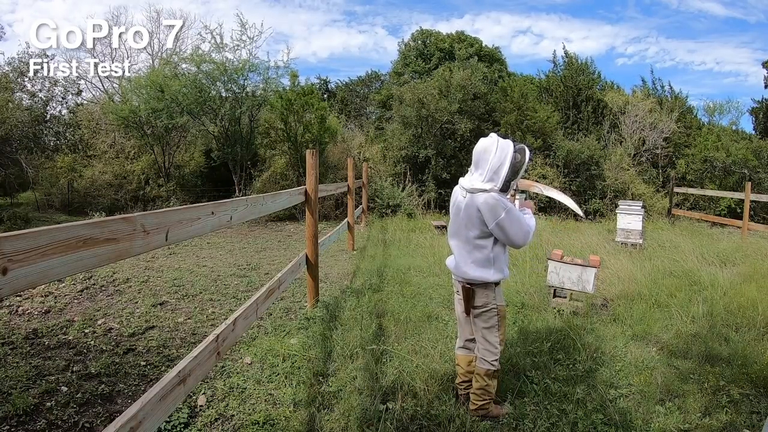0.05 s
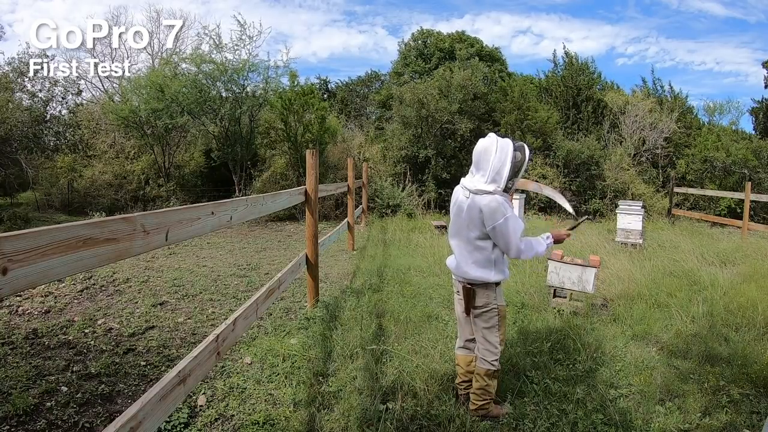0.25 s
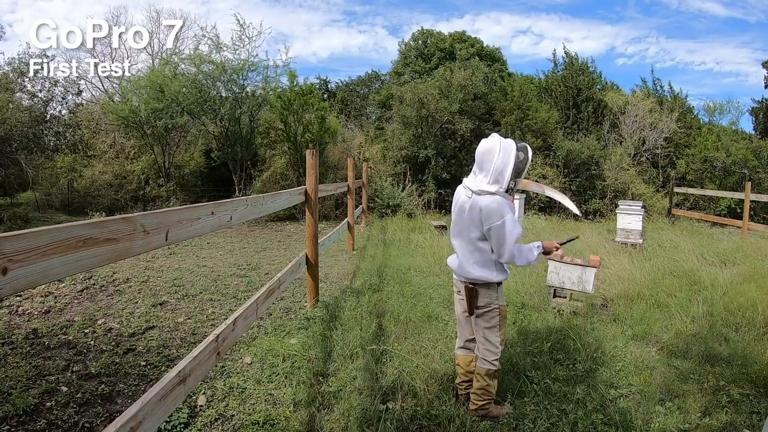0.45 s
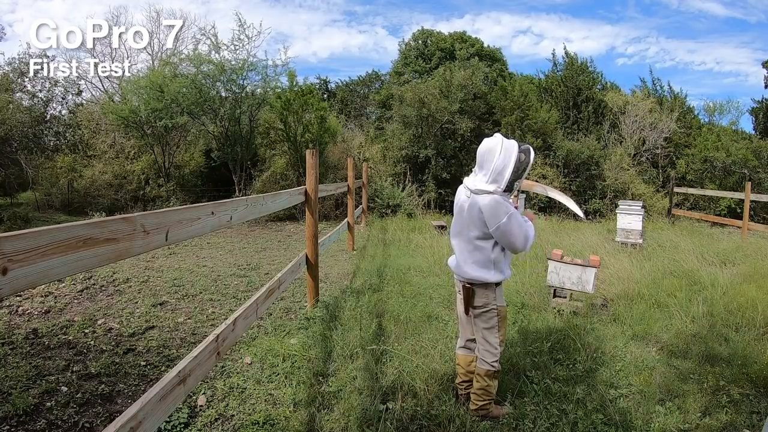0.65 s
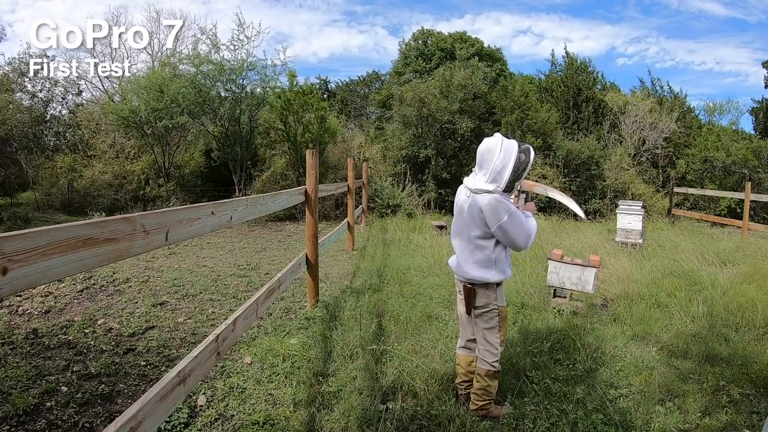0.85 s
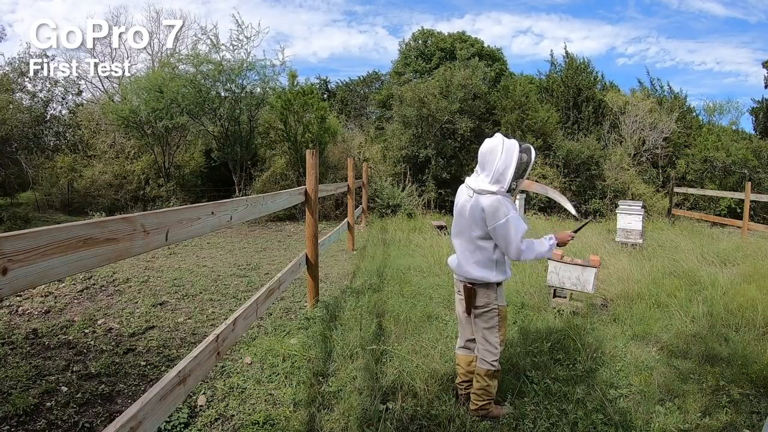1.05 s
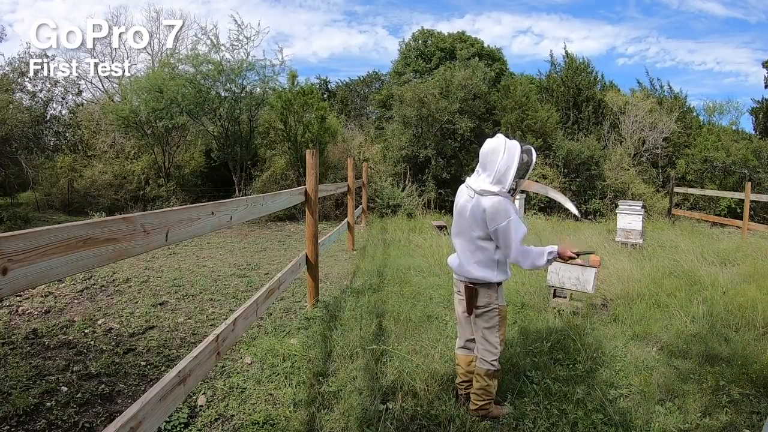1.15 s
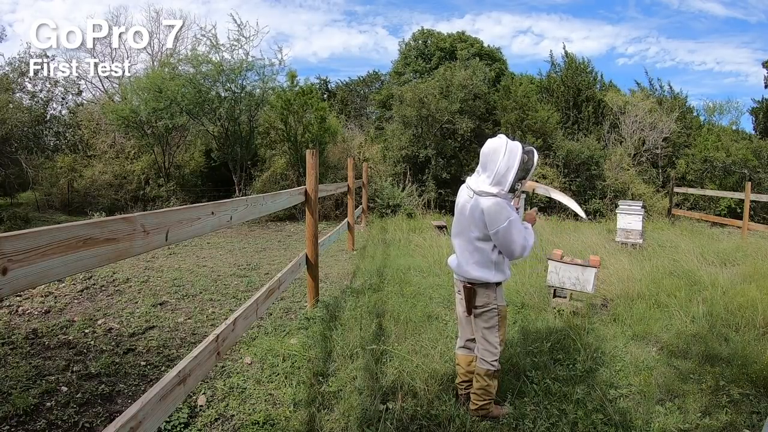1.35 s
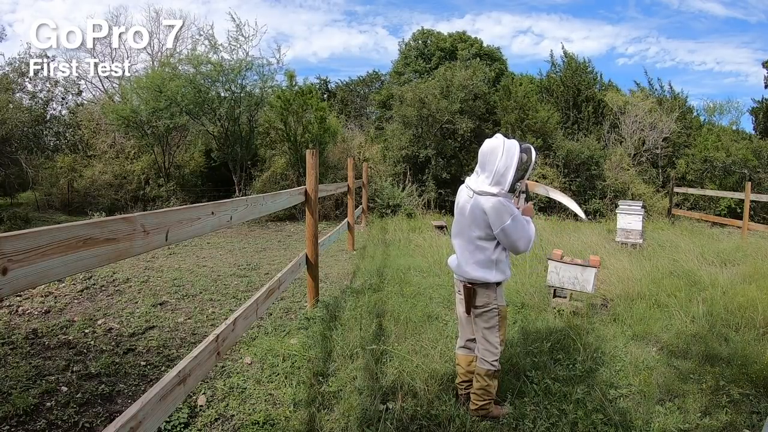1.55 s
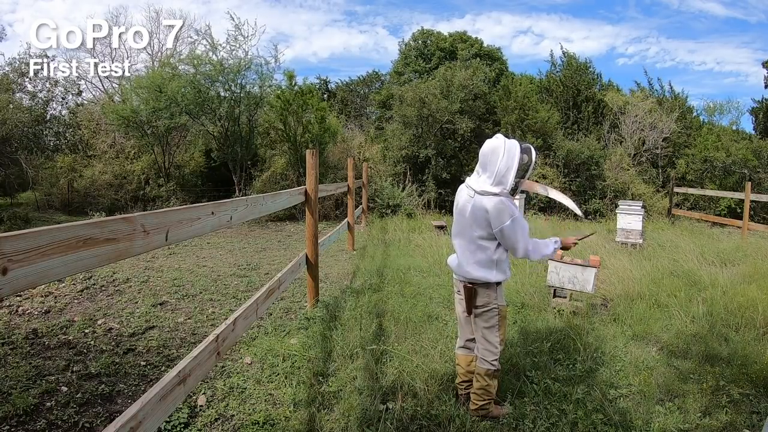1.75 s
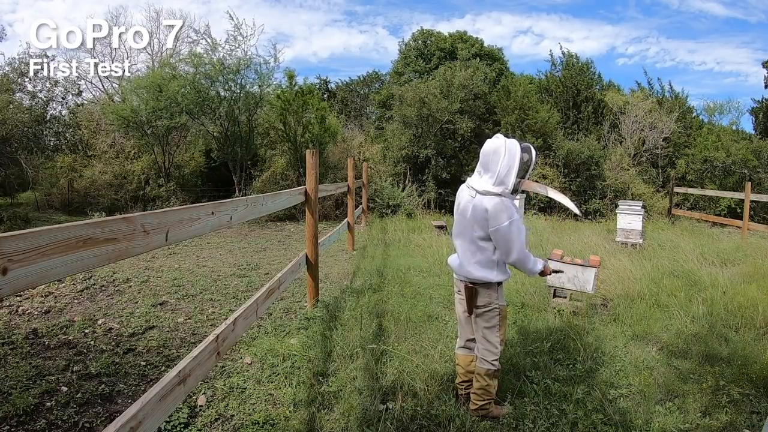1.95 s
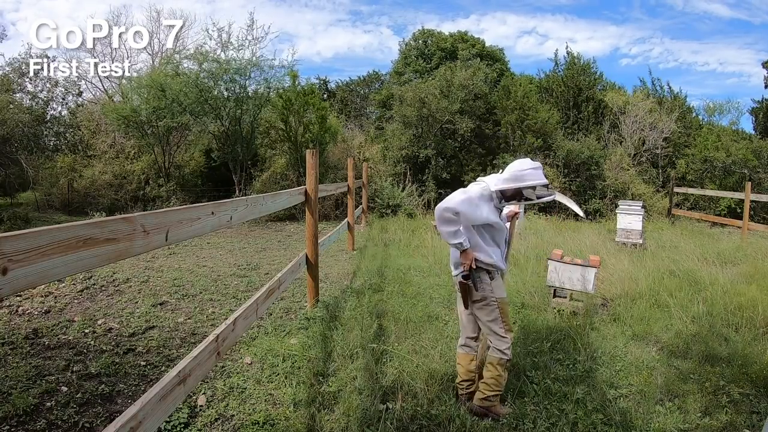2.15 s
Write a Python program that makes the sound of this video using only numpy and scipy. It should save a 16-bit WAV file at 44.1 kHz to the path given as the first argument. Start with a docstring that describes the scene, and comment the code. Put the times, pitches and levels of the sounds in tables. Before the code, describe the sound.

A whetstone scrapes a long steel blade in three quick strokes, each ending in a bright ring

```python
"""Sharpening a long blade outdoors

A whetstone is drawn three times along a long steel blade in an open field, over light wind and faint air noise.
Rough clicks through the damped blade make the scrapes; noise bursts make knocks, and sparser clicks the bites.
When the stone lets go, fading tones make the blade ring; there are also brief squeals and one faint chirp. Near
the end everything cuts off at once, and a gustier moment of shaped noise takes over."""
import sys
import numpy as np
from scipy import signal
from scipy.fft import rfft, irfft
from scipy.io import wavfile
from scipy.ndimage import uniform_filter1d

SR = 44100
rng = np.random.default_rng(int(sys.argv[2]) if len(sys.argv) > 2 else 0)


def materialize(psi):
    """Save the field psi as 16-bit PCM at rate SR to the path in sys.argv[1].

    A 1-D psi becomes a single channel; in a 2-D psi each row is a channel.
    """
    bounded = np.clip(np.atleast_2d(psi).T, -1, 1)
    quanta = np.round(bounded * 32767).astype(np.int16)
    wavfile.write(sys.argv[1], SR, quanta)


N = 97020  # length in samples: 2.2 s
TIME = np.arange(N) / SR


def amp(db):
    """Turns decibels into a plain multiplier."""
    return 10 ** (np.asarray(db) / 20)


def unit(x):
    """Scales a sound to an average (RMS) level of one."""
    return x / np.sqrt(np.mean(x ** 2) + 1e-20)


def read(points, hz):
    """Reads a curve between its points, along a logarithmic frequency scale."""
    point_hz, value = np.transpose(points)
    return np.interp(np.log(hz + 1), np.log(point_hz + 1), value)


def add(mix, s, sound):
    """Adds a sound into the mix from time s, cutting it off at the end."""
    start = max(round(s * SR), 0)
    part = mix[:, start:][:, :sound.shape[1]]
    part += sound[:, :part.shape[1]]


def colour(x, spectrum, tilt_db=0):
    """Reshapes the strength of each frequency, tilted in dB per octave above 500 Hz, at unit level."""
    hz = np.fft.rfftfreq(x.shape[-1], 1 / SR)
    octaves = np.log2(np.maximum(hz, 500))
    gain = amp(read(spectrum, hz) + tilt_db * octaves)
    return unit(irfft(rfft(x) * gain, x.shape[-1]))


# How much louder the left microphone is: (frequency [Hz], left minus right [dB])
BALANCE = [(170, -1.5), (450, 3), (740, -6), (1200, -10), (2000, -1.5), (3300, -5), (5500, 0.5),
           (9000, 1.5), (15000, -2)]
# How far the left microphone is ahead in phase: (frequency [Hz], lead [radians])
LEAD = [(200, -0.72), (2800, 0.3), (6200, -1.1), (8100, -1.87), (12000, -1.8)]


def ports(hz):
    """Loudness and phase (as complex numbers) of the blade at the left and right microphone."""
    half = amp(read(BALANCE, hz) / 2) * np.exp(.5j * read(LEAD, hz))
    power = (abs(half) ** 2 + abs(half) ** -2) / 2
    return np.array([half, 1 / half]) / np.sqrt(power)


# How alike the two microphones sound: (frequency [Hz], likeness [0 to 1])
LIKENESS = [(200, 0.65), (700, .6), (1300, 0.79), (2400, 0.81), (4400, 0.95), (8000, 0.46), (15000, 0.36)]


def placed(pair):
    """Mixes two unrelated signals into the partly alike pair that the two microphones hear."""
    hz = np.fft.rfftfreq(pair.shape[1], 1 / SR)
    a, b = rfft(pair)
    same = read(LIKENESS, hz)
    left = same * a + np.sqrt(1 - same ** 2) * b
    return irfft(np.array([left, a]) * ports(hz), pair.shape[1])


def outdoor_noise(spectrum, shared):
    """Noise partly shared by both microphones, because each adds its own to a common part."""
    a, b, both = rng.standard_normal((3, N))
    return colour(np.array([a, b]) + shared * both, spectrum)


def buffeting(spectrum, lumpy_db, shared):
    """Wind on the microphones swells in quick random lumps, made by smoothing noise twice."""
    lumps = rng.standard_normal(N)
    for _ in range(2):
        lumps = uniform_filter1d(lumps, size=800)
    return unit(outdoor_noise(spectrum, shared) * amp(lumpy_db * unit(lumps)))


# Strength of the wind: (time [s], level [dB])
WIND = [(0, -65), (.22, -60), (.4, -64), (.7, -64.5), (.9, -80), (1.15, -67), (1.22, -52.5), (1.33, -57),
        (1.52, -52.5), (1.72, -52.5), (1.92, -67.5), (2.06, -53)]
# Colour of the wind rumble: (frequency [Hz], level [dB])
RUMBLE = [(20, -6), (45, 1), (90, -2.5), (150, -6.5), (250, -25), (500, -42.5), (2000, -65)]


def wind():
    """Wind pushing on the microphones makes a lumpy low rumble that rises and falls."""
    level = amp(np.interp(TIME, *np.transpose(WIND)))
    return level * buffeting(RUMBLE, lumpy_db=3.5, shared=1.0)


AIR_DB = -63.5
# Colour of the steady outdoor noise: (frequency [Hz], level [dB])
AIR = [(60, -17.5), (130, 0), (250, 0.5), (500, -6.5), (800, -5.5), (1400, -11.5), (2800, -12), (5000, -19),
       (8000, -24), (10500, -35.5), (15000, -65)]


def air():
    """Faint steady noise of the open air, partly the same at both microphones."""
    return amp(AIR_DB) * outdoor_noise(AIR, shared=1.0)


def grit(per_s, spread_db=4.5):
    """Clicks of uneven size at random moments as grains catch the steel."""
    size = amp(spread_db * np.minimum(rng.exponential(1, N), 3))
    caught = rng.random(N) < per_s / SR
    return unit(size * rng.choice([-1, 1], N) * caught)


HELD_SHARE = 0.94  # share of each click's energy that passes through the blade's resonances


def held_blade(clicks, t60, size=8192):
    """The blade's crowded, damped resonances, as two fading noises; the first also passes the direct click."""
    fade = amp(-60 * np.arange(size) / SR / t60)
    body = rng.standard_normal((2, size)) * fade
    body *= np.sqrt(HELD_SHARE) / np.linalg.norm(body, axis=1, keepdims=True)
    body[0, 0] += np.sqrt(1 - HELD_SHARE)
    return signal.fftconvolve(clicks[None], body, axes=1)[:, :N]


GRIT_PER_S = 7000  # average clicks per second
HELD_T60 = 0.095  # seconds to fade by 60 dB while the stone damps the blade
BRIGHTEN_DB_PER_OCT = 3  # change of tilt from the start to the end of a stroke
# Force of the stone on the edge, one list per stroke: (time [s], level [dB])
STROKES = [
    [(.034, -41), (.06, -48.5), (.09, -51), (.125, -39), (.15, -38), (.205, -35.5), (.26, -36.5),
     (.335, -30.5), (.36, -44.5)],
    [(.922, -38.5), (.95, -38.5), (1.0, -38.5), (1.06, -34.5), (1.125, -32), (1.175, -32)],
    [(1.655, -48), (1.675, -39.5), (1.70, -38.5), (1.735, -33.5), (1.76, -31.5), (1.82, -30.5), (1.85, -31),
     (1.88, -26.5)],
]
# Colour of the scraping, before the tilt: (frequency [Hz], level [dB])
SCRAPE = [(120, -19.5), (250, -15), (450, -20), (650, -16.5), (900, -9), (1100, -5.5), (1300, -8.5),
          (1650, -6), (2400, -2.5), (3500, -1.5), (5500, -5.5), (7600, -4.5), (9800, -13.5), (11200, -23),
          (13500, -27), (15400, -36.5)]


def scrape(force, count=5):
    """The stone travels along the edge: resonances change with its place and the hiss brightens."""
    s, db = np.transpose(force)
    level = amp(np.interp(TIME, s, db)) * (TIME >= s[0]) * (TIME < s[-1])
    place = np.clip((TIME - s[0]) / (s[-1] - s[0]), 0, 1)
    clicks = grit(GRIT_PER_S) * level
    out = 0
    # Crossfade between spots along the blade, each with its own resonances
    for spot in np.linspace(0, 1, count):
        near = np.sqrt(np.maximum(1 - abs(place - spot) * (count - 1), 0))
        tilt_db = BRIGHTEN_DB_PER_OCT * (spot - .55)
        part = colour(held_blade(clicks * near, HELD_T60), SCRAPE, tilt_db)
        out = out + part * np.sqrt(np.mean((level * near) ** 2))
    return out


KNOCK_T60 = 0.11  # seconds to fade by 60 dB
# Knocks of the stone on the edge: (time [s], level [dB])
KNOCKS = [(.034, -41.5), (.158, -34), (0.9216, -35), (1.655, -46)]
# Colour of a knock: (frequency [Hz], level [dB])
CLANK = [(150, -26.5), (400, -15.5), (700, 2), (1500, -3), (2500, 2.5), (4300, 4), (6000, -9.5),
         (8000, -7.5), (10000, -32), (12000, -37), (15000, -48.5)]


def knock(s, db):
    """The stone knocks on the edge: a burst of noise is the short clank of the damped blade."""
    t = TIME - s
    fade = (t >= 0) * amp(db - 60 * np.maximum(t, 0) / KNOCK_T60)
    return fade * colour(rng.standard_normal((2, N)), CLANK)


def field(x, level_db=-30, t60=.9):
    """Faint scattered echoes from grass, fence and trees, as a fading tail of noise."""
    t = np.arange(SR) / SR
    echo_colour = [(200, 15.5), (3000, -1.5), (6000, -2), (12000, -15)]  # (frequency [Hz], level [dB])
    tail = colour(rng.standard_normal((2, SR)), echo_colour)
    tail *= np.minimum(t / .03, 1) * amp(-60 * t / t60)
    tail /= np.linalg.norm(tail[0])
    return amp(level_db) * signal.fftconvolve(x, tail, axes=1)[:, :N]


def whistle(s, length, start_hz, end_hz, db, width_hz):
    """A short fuzzy tone that swells and fades: slow noise carried up to the wanted pitch."""
    t = np.arange(0, length, 1 / SR)
    real, imaginary = rng.standard_normal((2, SR // 4))
    lowpass = signal.butter(2, width_hz / 2, fs=SR, output="sos")
    fuzz = signal.sosfilt(lowpass, real + 1j * imaginary)[-len(t):]
    hz = start_hz + (end_hz - start_hz) * t / length
    turn = np.exp(2j * np.pi * np.cumsum(hz) / SR)
    tone = fuzz * turn * np.sin(np.pi * t / length)
    return s, amp(db) * unit((ports(start_hz)[:, None] * tone).real)


# Brief squeals: (time [s], length [s], pitch [Hz], level [dB])
SQUEALS = [(0.099, 0.051, 3296, -50), (0.18, 0.078, 2434, -40), (0.199, .05, 896, -47),
           (1.684, 0.0407, 4670, -41), (1.772, 0.0516, 3407, -42), (1.81, 0.024, 6150, -38.5)]


def squeal(s, length, hz, db):
    """The stone sticks and slips in a brief rough squeal, a fuzzy tone at one pitch."""
    return whistle(s, length, hz, hz, db, width_hz=110)


CHATTER_PER_S = 4500  # average clicks per second
BITE_T60 = 0.11  # seconds to fade by 60 dB
# Hard bites near the tip: (time [s], level [dB], rise [s], hold [s], tilt [dB per octave])
BITES = [(0.341, -26.5, 0.0024, .012, 7.5), (0.348, -19, .009, 0.018, -1.5),
         (1.133, -25, 0.012, 0.027, 1.0), (1.161, -19, 0.0079, 0.0061, -0.5),
         (1.864, -31, 0.0036, 0.0163, -5)]
# Colour of a bite, before its tilt: (frequency [Hz], level [dB])
BITE = [(90, -44.5), (150, -26), (300, -20.5), (480, -30), (620, -16), (850, -7.5), (1100, -6),
        (1500, -20.5), (2050, -3.5), (3000, 0.5), (3900, 1.5), (5200, -0.5), (7500, -6.5), (9800, -20.5),
        (11300, -33.5), (14000, -37), (15400, -52)]


def bite(s, db, rise, hold, tilt_db):
    """The stone chatters hard over the tip as clicks in the damped blade; the clash dies quickly."""
    t = TIME - s
    fade = amp(db - 60 * np.maximum(t - rise - hold, 0) / BITE_T60)
    level = np.clip(t / rise, 0, 1) * fade
    return level * colour(held_blade(grit(CHATTER_PER_S), BITE_T60), BITE, tilt_db)


# The stone leaves the blade: (time the ringing peaks [s], build-up [s], level of the weak modes [dB])
RELEASES = [(.385, 0.031, -27), (1.182, .016, -24), (1.884, .016, -31.5)]
# Pitches at which the free blade rings, its modes: (frequency [Hz])
MODE_HZ = [175, 279, 540, 842, 1077, 1339, 1388, 1505, 1696, 1790, 1862, 2082, 2466, 2687, 2807, 3008, 3246,
           3290, 3425, 3808, 3972, 4306, 4651, 4855, 5178, 5868, 6019, 6190, 6454, 6896, 7000, 7385, 7795,
           8270, 9570]
# The modes in the same order: (60 dB fade time before the limit below [s],
# level after stroke 1 [dB], after stroke 2 [dB], after stroke 3 [dB])
MODES = [(1.07, -43.5, -41.5, -87), (1.3, -54, -61.5, -73), (0.28, -54, -45, -60), (.22, -41.5, -51.5, -38),
         (0.2, -36, -33.5, -28.5), (0.38, -42, -68.5, -60), (0.45, -40, -47, -49.5),
         (.32, -51.5, -49.5, -39), (0.42, -42, -40.5, -41.5), (0.33, -37, -39, -35.5),
         (0.84, -36, -32, -44), (0.24, -32.5, -31.5, -27), (.34, -36.5, -37.5, -33.5),
         (0.99, -37.5, -45, -45), (0.2, -50, -46, -30), (0.4, -18.5, -28.5, -39),
         (0.51, -58.5, -47.5, -33.5), (.3, -37.5, -42, -61), (0.16, -41, -47, -33), (0.27, -37, -27.5, -54),
         (.33, -50.5, -43, -43), (.28, -47.5, -27.5, -57), (.28, -33, -37, -63), (0.19, -26.5, -27, -52),
         (.32, -43.5, -32, -62), (0.32, -38, -32.5, -33), (0.67, -38, -56.5, -52), (.31, -39, -32, -54),
         (0.21, -43.5, -46.5, -57), (0.23, -41.5, -48, -58), (0.7, -50, -32, -44),
         (0.46, -33, -39.5, -33.5), (0.58, -35, -32, -55), (0.18, -46.5, -34, -58), (0.31, -49, -41.5, -44)]
# Losses in the steel limit the ringing: (frequency [Hz], longest 60 dB fade time [s])
LONGEST_T60 = [(1900, 1.4), (2500, .4), (3000, .33), (7000, .33), (8000, .25), (10000, .24)]
# The mode between these limits is a close pair that beats: (low [Hz], high [Hz])
TWIN_BAND = (2900, 3100)
TWIN_SPLIT_HZ = 1.98
# Colour of the crowd of weak modes: (frequency [Hz], level [dB])
SHIMMER = [(300, -26.5), (650, -13), (900, -14), (1500, -11.5), (2500, -1.5), (5000, -4.5), (8000, -3.5),
           (10000, -12), (11500, -28.5), (14300, -29.5), (15200, -46.5)]
SHIMMER_T60 = 0.27  # seconds to fade by 60 dB


def ring(stroke, s, build, shimmer_db, count=170):
    """The freed blade rings in its main modes, as fading tones, and a crowd of weak ones."""
    t = np.arange(SR) / SR
    swell, free = np.minimum(t / build, 1), np.maximum(t - build, 0)
    out = np.zeros((2, SR))
    for hz, (t60, *levels) in zip(MODE_HZ, MODES):
        limited_t60 = min(t60, read(LONGEST_T60, hz))
        level = swell * amp(levels[stroke] - 60 * free / limited_t60)
        tone = level * np.exp(2j * np.pi * hz * t)
        if TWIN_BAND[0] < hz < TWIN_BAND[1]:
            tone = tone * np.cos(np.pi * TWIN_SPLIT_HZ * free)
        out += (ports(hz)[:, None] * tone).real
    # Weak modes: steady tones at random pitches, 2 Hz per step, in half a second of sound
    short = SR // 2
    lines = np.zeros((2, short // 2 + 1), complex)
    at = rng.integers(170, 7500, count)
    lines[:, at] = np.exp(2j * np.pi * rng.random((2, count)))
    crowd = unit(placed(colour(irfft(lines, short), SHIMMER)))
    crowd_level = swell * amp(shimmer_db - 60 * free / SHIMMER_T60)
    out[:, :short] += crowd * crowd_level[:short]
    return s - build, out


# A faint chirp from far off: (time [s], length [s], start [Hz], end [Hz], level [dB], width [Hz])
CHIRP = (.635, .11, 2950, 3300, -69, 160)


def chirp():
    """A faint rising chirp: a fuzzy tone whose pitch glides upwards."""
    return whistle(*CHIRP)


GUST_DB = -45.5
# Colour of the gusty ending: (frequency [Hz], level [dB])
GUST = [(20, 1), (60, -1), (110, 0), (170, 2), (280, -8.5), (450, -21.5), (900, -27), (3000, -37.5),
        (8000, -48.5), (14000, -70)]


def gust():
    """Stronger wind buffets the microphones, as lumpy noise that they largely share."""
    return amp(GUST_DB) * buffeting(GUST, lumpy_db=2.0, shared=2.8)


CUT_S = 2.074  # time of the abrupt cut to the gusty moment


def scene():
    """Plays blade, echoes, wind and air together, then cuts to the gust alone."""
    rubbing = sum(scrape(force) for force in STROKES)
    rubbing = rubbing + sum(knock(*row) for row in KNOCKS)
    rubbing = rubbing + sum(bite(*row) for row in BITES)
    blade = placed(rubbing)
    for row in SQUEALS:
        add(blade, *squeal(*row))
    for stroke, row in enumerate(RELEASES):
        add(blade, *ring(stroke, *row))
    background = wind() + air()
    add(background, *chirp())
    return np.where(TIME < CUT_S, blade + field(blade) + background, gust())


def record(dry, edge_hz=15500):
    """The recorder's band limit: a steep filter removes the highest frequencies."""
    lowpass = signal.firwin(511, edge_hz, window=("kaiser", 9), fs=SR)
    return signal.oaconvolve(dry, lowpass[None], "same")


dry = scene()
out = record(dry)
materialize(out)
```